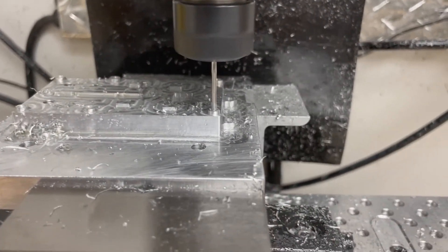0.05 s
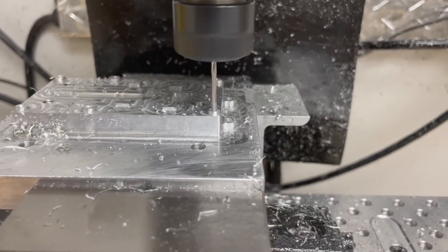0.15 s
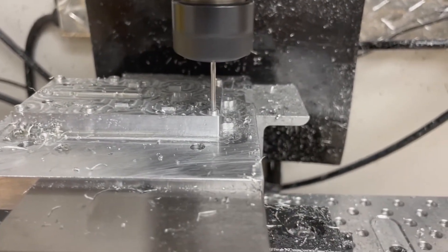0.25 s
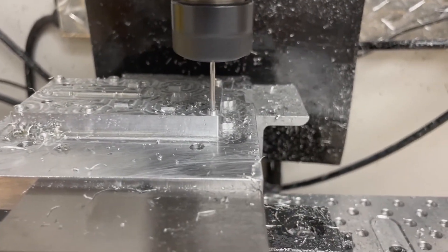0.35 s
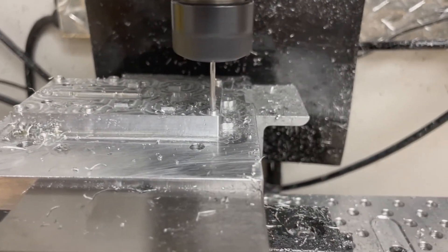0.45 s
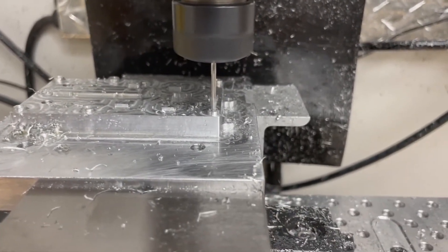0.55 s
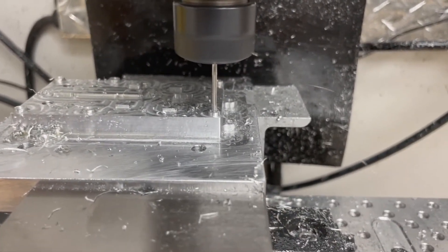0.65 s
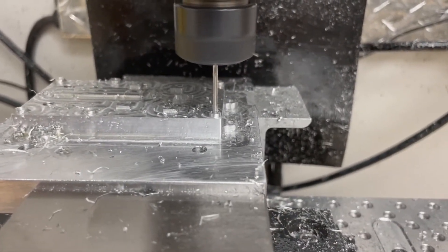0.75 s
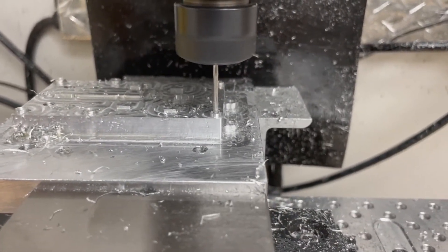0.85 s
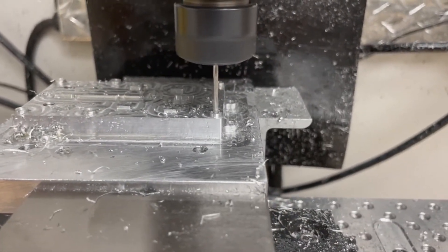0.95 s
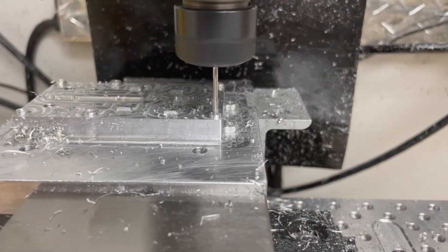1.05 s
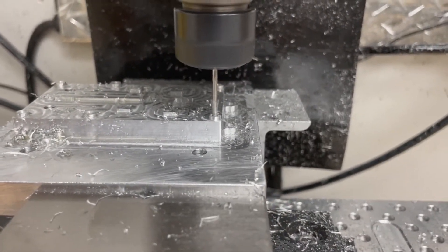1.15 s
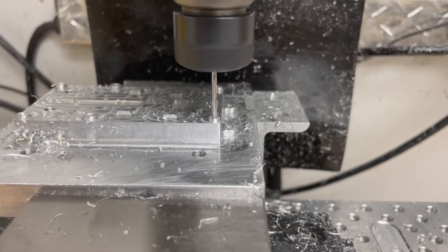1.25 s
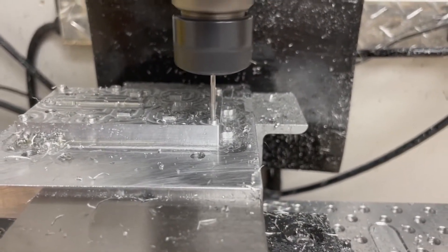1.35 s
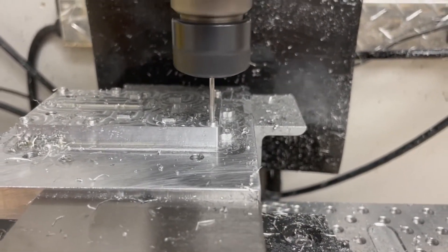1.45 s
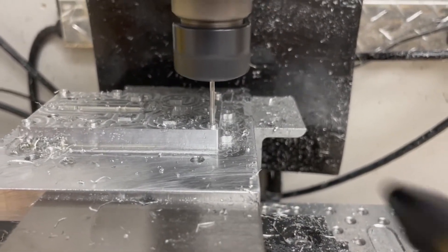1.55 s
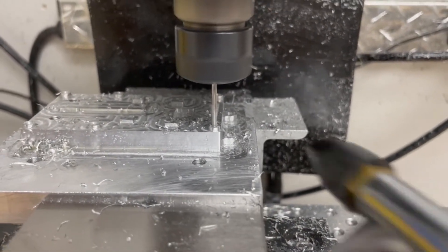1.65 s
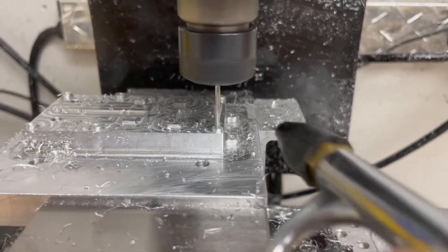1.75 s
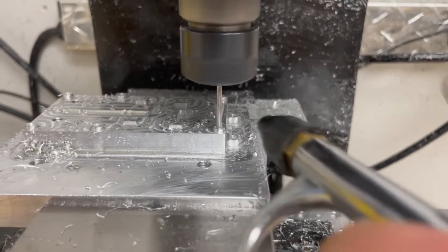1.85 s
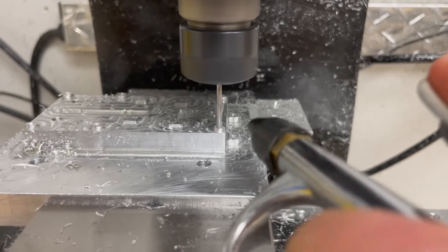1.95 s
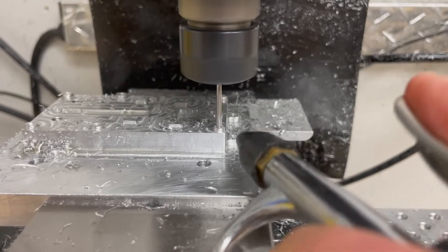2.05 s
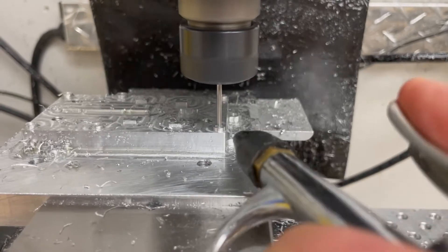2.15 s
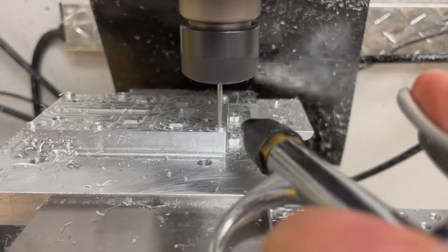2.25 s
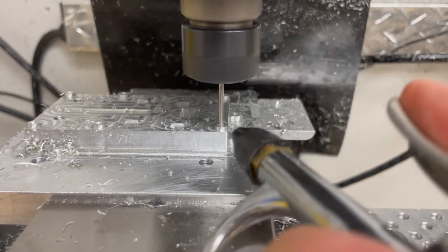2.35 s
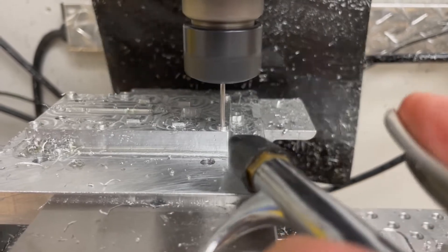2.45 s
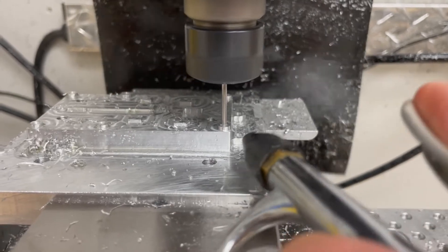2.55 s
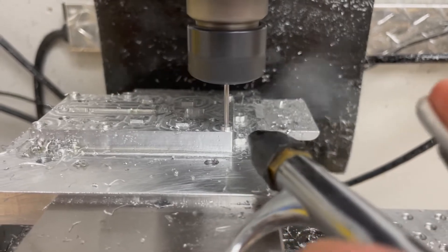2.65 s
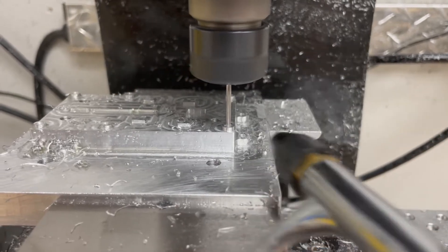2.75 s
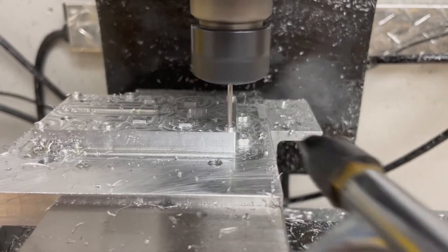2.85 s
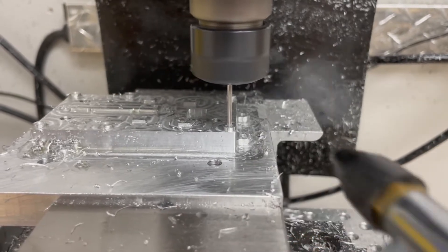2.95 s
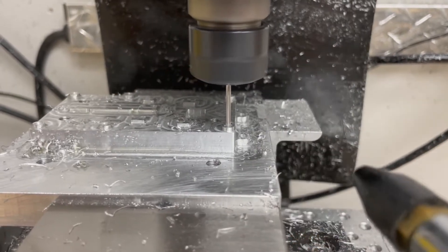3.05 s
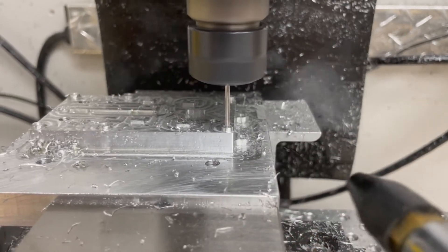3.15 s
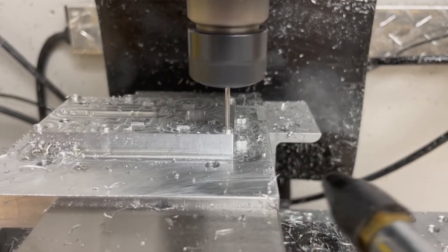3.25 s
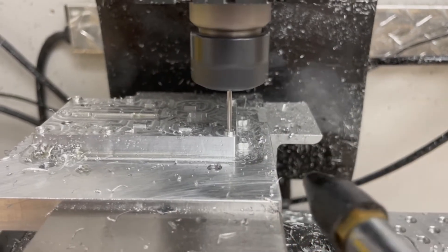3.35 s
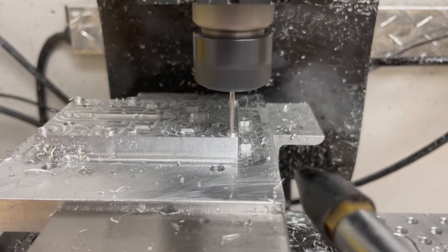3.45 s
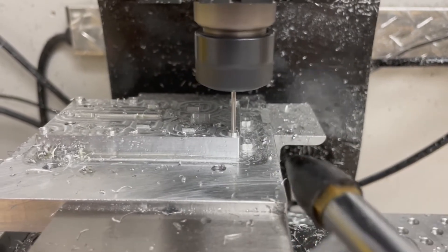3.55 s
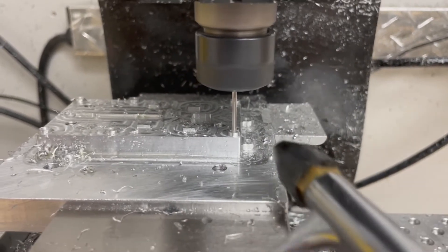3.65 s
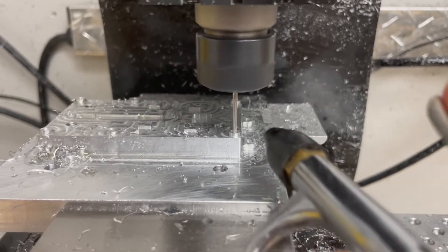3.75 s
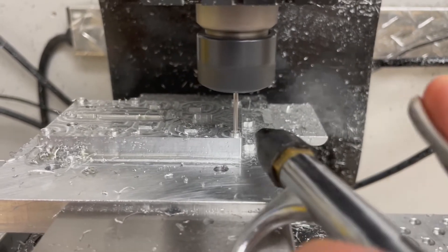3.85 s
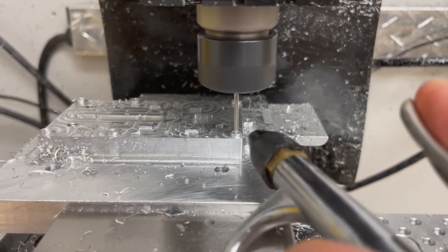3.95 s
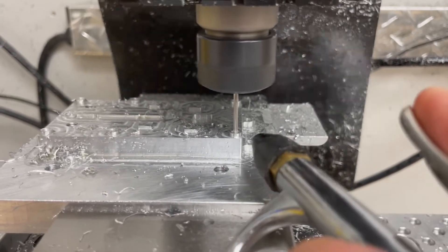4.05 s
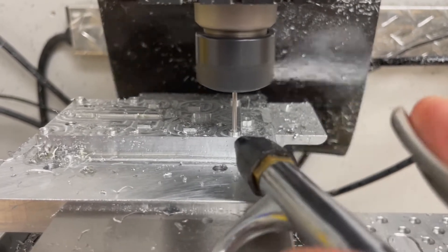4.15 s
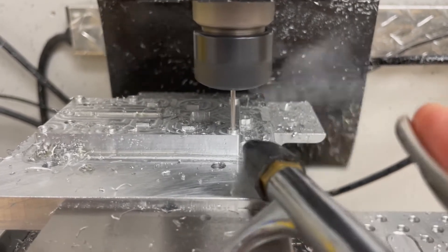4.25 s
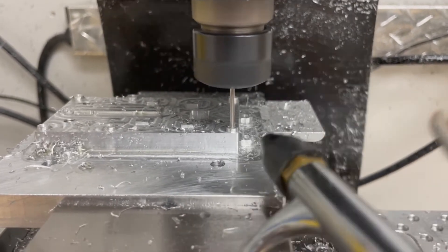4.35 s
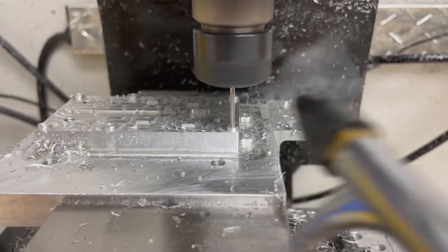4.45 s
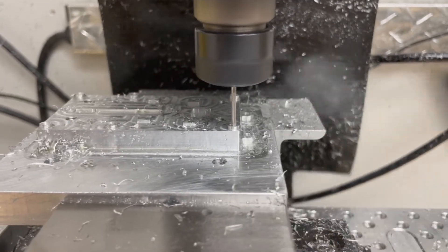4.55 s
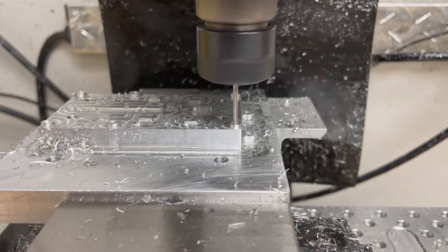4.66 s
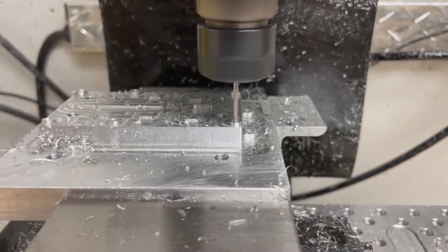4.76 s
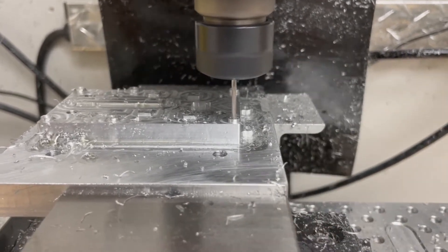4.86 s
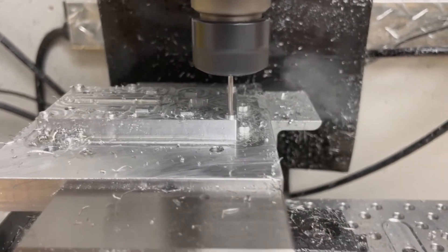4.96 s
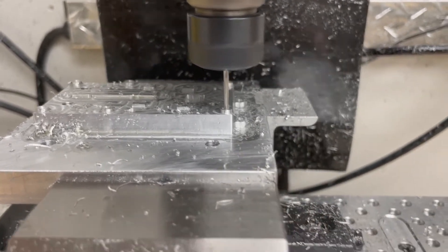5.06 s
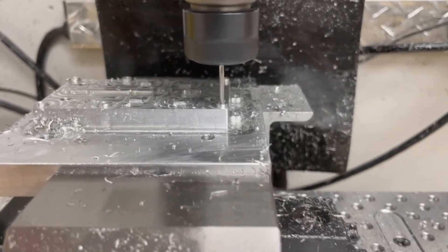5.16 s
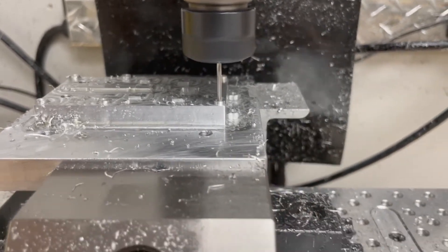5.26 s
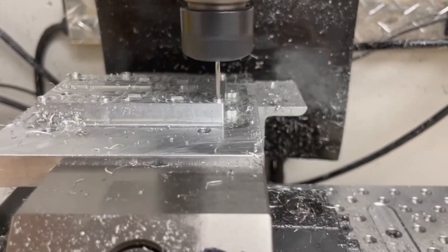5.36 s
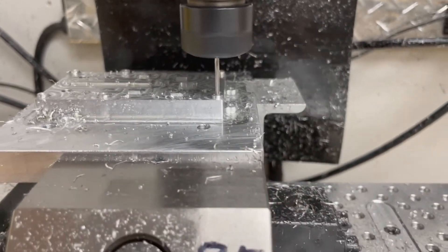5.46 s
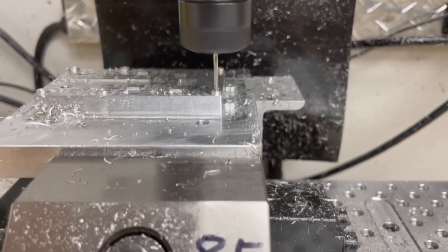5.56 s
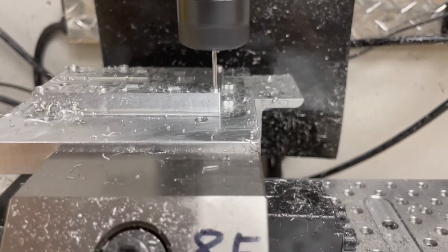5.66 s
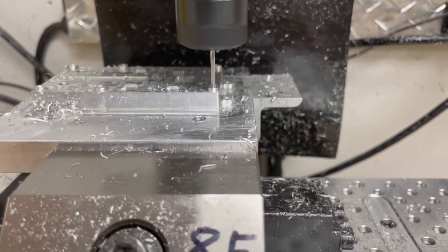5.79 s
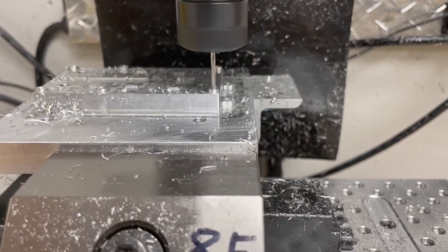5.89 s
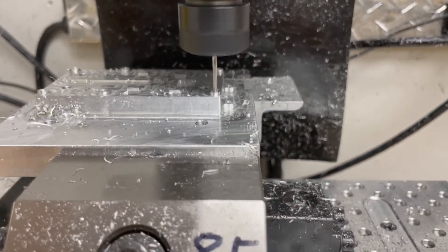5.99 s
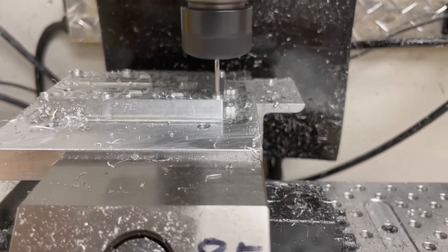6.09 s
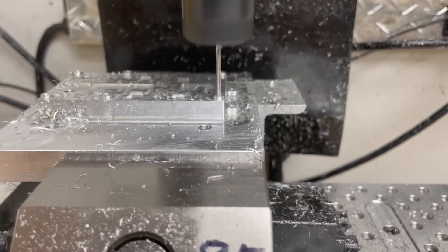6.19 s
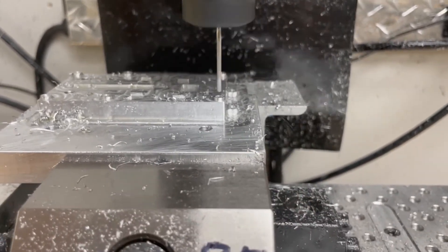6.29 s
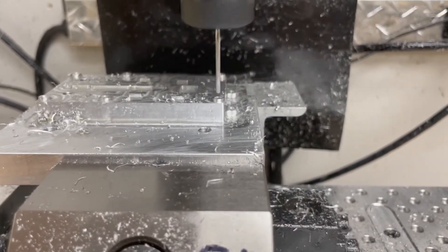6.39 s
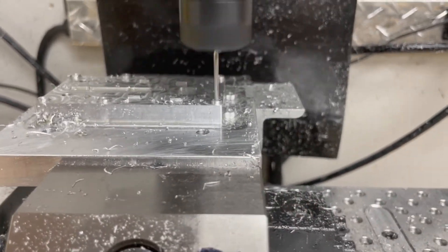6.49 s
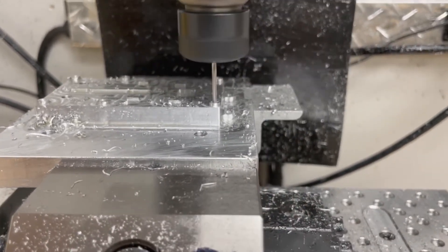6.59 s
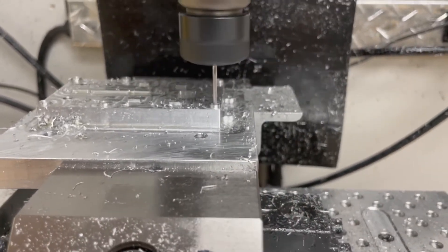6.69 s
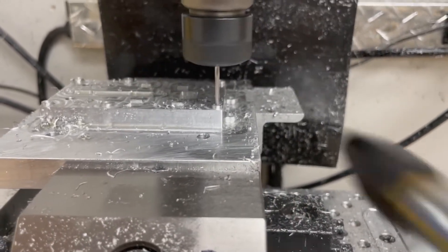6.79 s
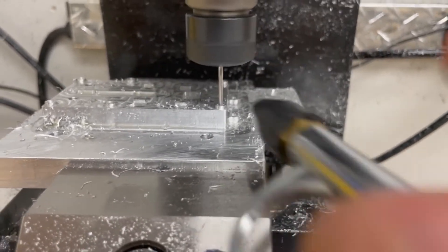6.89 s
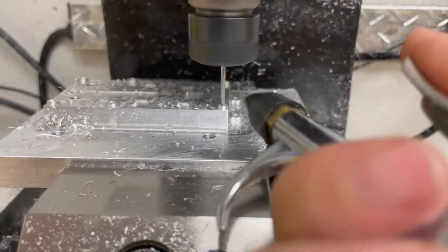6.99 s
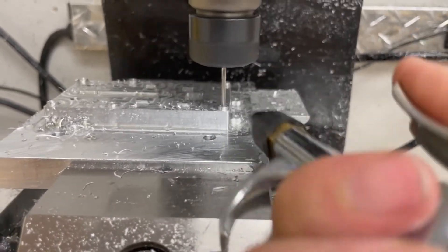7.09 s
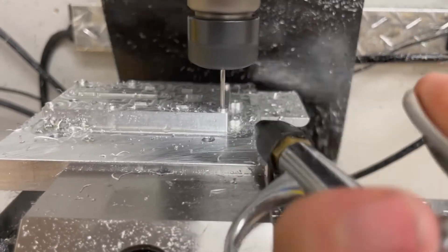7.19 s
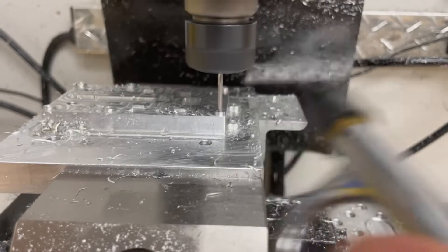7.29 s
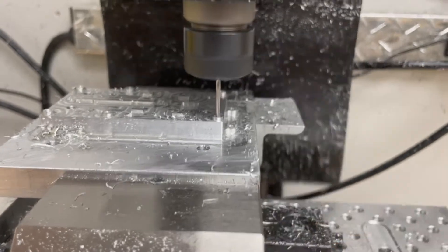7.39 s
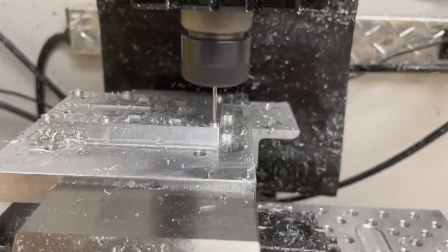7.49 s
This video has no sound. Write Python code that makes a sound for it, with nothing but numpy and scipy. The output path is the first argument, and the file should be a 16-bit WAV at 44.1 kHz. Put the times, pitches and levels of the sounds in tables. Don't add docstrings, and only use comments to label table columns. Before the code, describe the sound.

A small mill runs throughout, recorded close in stereo on a hand-held phone. Its bearings hiss, a thin whine sits near 10 kHz, and the housing rings roughly over a low rumble, all throbbing 45 times a second. Small metallic chirps and squeals surface at 0.7 and 1.4 s. At 2.06 s a strong, sagging air blast bursts out with a gusty thump, a weaker one at 2.33, with a low hose shudder between. The mill ducks, then returns quieter; rumble eases around 2.75-3.1. A feed motor groans with jolts at 3.5-3.9. Two more blasts hit at 3.97 and 4.24, hose shuddering between. A tiny axis nudge comes at 5.4, then a long, jerky low groan from 6.1 to 6.6. A slight air leak at 6.98 leads into the last short blast at 7.07; the quieter machine continues with a faint squeal until 7.5.

```python
import sys
import numpy as np
from scipy import signal
from scipy.fft import rfft, irfft, next_fast_len
from scipy.io import wavfile
from scipy.ndimage import uniform_filter1d

SR = 44100
rng = np.random.default_rng(int(sys.argv[2]) if len(sys.argv) > 2 else 0)


def amp(db):
    return 10 ** (np.asarray(db, float) / 20)


def write(x):
    x = np.atleast_2d(x).T
    wavfile.write(sys.argv[1], SR, np.round(np.clip(x, -1, 1) * 32767).astype(np.int16))


N = 332051
SIZE = next_fast_len(N)
HZ = np.maximum(np.arange(SIZE // 2 + 1) * SR / SIZE, 1)
TIME = np.arange(N) / SR
COARSE = TIME[::32]

# [f/Hz, lead/rad]
PORT_LEAD = [(520, 1.4), (1100, 0), (1640, 2.5), (2100, 1), (3100, 0.34), (3600, 2.15), (4400, 0.5),
             (5800, 2.5), (6700, 0.41)]
# [f/Hz, share 0-1]
PORT_COMMON = [(60, 0.56), (300, 0.88), (700, 0), (1600, 0.87), (3000, 0.65), (5500, 0.2), (7500, 0.8)]


def on_hz(table):
    hz, value = np.transpose(table)
    return np.interp(np.log(HZ), np.log(np.maximum(hz, 1)), value)


def shaped(x, gain):
    return irfft(rfft(x, SIZE) * gain, SIZE)[..., :N]


def unit(x, lo_hz=1, hi_hz=SR / 2):
    mid = shaped(np.atleast_2d(x).mean(axis=0), (HZ >= lo_hz) & (HZ <= hi_hz))
    return x / np.sqrt(np.mean(mid ** 2))


def bell(hz, width):
    return 1 / (1 + (2 * abs(HZ - hz) / width) ** 3)


def walk(rate):
    k = int(SR / rate)
    steps = np.repeat(rng.standard_normal(N // k + 1), k)
    return 1.05 * uniform_filter1d(uniform_filter1d(steps, k), k)[:N]


def ports(three, lead, common, colour=1):
    # [f/Hz, left lead/half turns]
    path = [(8600, 1), (10800, 2), (12650, 3), (14800, 4), (17200, 5)]
    # [f/Hz, share 0-1]
    treble_common = [(8200, .97), (16000, .97)]
    share = np.clip(on_hz(common + treble_common), 0, 1)
    bass_lead = [(200, 0)]
    treble_lead = [(hz, np.pi * k) for hz, k in path]
    left_right = np.array([[1], [-1]])
    turn = np.exp(.5j * on_hz(bass_lead + lead + treble_lead) * left_right)
    spectra = rfft(three, SIZE) * colour
    shared = spectra[0] * np.sqrt(share) * turn
    own = spectra[1:] * np.sqrt(1 - share)
    return irfft(shared + own, SIZE)[:, :N]


def held(start, stop, rise, fall, sag=0):
    attack = -rise * np.maximum(start - COARSE, 0)
    hold = -sag * np.clip(COARSE - start, 0, stop - start)
    return attack + hold - fall * np.maximum(COARSE - stop, 0)


def summed(envelopes_db):
    valve_s = .008
    power = sum(amp(2 * db) for db in envelopes_db)
    eased = uniform_filter1d(power, size=int(valve_s * SR / 32))
    return np.interp(TIME, COARSE, np.sqrt(abs(eased)))


def clatter(turns, memory):
    size = 1024
    memory = np.clip(memory, 0, .95)
    fresh = rng.standard_normal((3, int(turns[-1]) + 2, size))
    kept = signal.lfilter([np.sqrt(1 - memory ** 2)], [1, -memory], fresh, axis=1)
    return kept.reshape(3, -1)[:, (turns * size).astype(int)]


def throb(turns, place, depth_db):
    angle = 2 * np.pi * (turns - place)
    return amp(depth_db * (np.cos(angle) + 0.16 * np.cos(2 * angle)))


def evened(ring, width, share):
    swell = uniform_filter1d((ring ** 2).sum(axis=0), size=int(SR / width / 2))
    ring = ring / (swell + .05 * swell.mean()) ** (share / 2)
    return ring / ring.std()


def gain_control():
    # [ducks t/s, lets go t/s, settles at level/dB]
    ducks = [
        (2.06, 2.53, -7),
        (3.966, 4.397, -8.5),
        (7.084, 7.23, -8),
    ]
    ducked_db, duck_s, recover_s = -14, .13, 0.078
    points, rest_db = [], 0
    for start, stop, settled_db in ducks:
        points += [(start, rest_db), (start + duck_s, ducked_db)]
        points += [(stop, ducked_db), (stop + recover_s, settled_db)]
        rest_db = settled_db
    return np.interp(TIME, *np.transpose(points))


def frame_rumble(knocks):
    # [f/Hz, level/dB per Hz]
    rumble_colour = [(30, -18), (55, 7.5), (130, -6.5), (180, 5), (260, -2), (500, -12.5)]
    return unit(shaped(knocks, amp(on_hz(rumble_colour))), 34, 191)


def drive_whine():
    tone = np.sqrt(2) * np.sin(2 * np.pi * 10346 * TIME + 2.1 * walk(12))
    return tone * amp(-6 + 1.3 * walk(9))


def bearing_hiss(turns, treble_db, high_db):
    # [f/Hz, level/dB per Hz]
    bearing_colour = [(110, -21), (300, -13), (600, -14.5), (1300, -20), (2300, -15.5), (3150, -18.5),
                      (3900, -13.5), (5500, -10), (7000, -8), (8500, -3), (9500, 1.5), (10500, -4.5),
                      (11500, -8), (13000, -11), (15200, -3.5)]
    hiss = clatter(turns, memory=.12) * throb(turns, 0, depth_db=2.7)
    hiss = hiss * amp(0.94 * walk(300) + .5 * walk(7.8))
    hiss = unit(ports(hiss, PORT_LEAD, PORT_COMMON, amp(on_hz(bearing_colour))), 9455, 10530)
    duller = shaped(hiss, 1 / (1 + (HZ / 7800) ** 16))
    return (hiss - duller) * amp(treble_db) + duller * amp(high_db + 3.5)


def housing_rings(turns, low_knocks, high_knocks, low_db, high_db, cut_db):
    # [f/Hz, width/Hz, level/dB, place in the turn 0-1, throb depth/dB, left minus right/dB]
    housing = [(382, 48, -12, 0.47, 4, -0.5), (889, 54, -13, 0.85, 5, -2), (1116, 102, -13, 0.24, 2, -0.5),
               (1591, 112, -5, 0.4, 3, 0), (1780, 45, -6.5, 0.46, 4, 2.5), (1891, 108, -4, 0.06, 3.5, 4),
               (2729, 160, -5.5, 0.75, 3, 4), (3582, 390, -5, 0.18, 3.5, -1),
               (4070, 45, -13, 0.5, 7.5, 4.5), (4268, 68, -4.5, 0.27, 6.5, 6),
               (4680, 310, -4.5, 0.66, 6.5, 7.5)]
    # [t/s, f/Hz, swell/dB, length/s]
    squeals = [
        (0.696, 4070, 11.5, .07),
        (1.397, 1891, 7, 0.046),
        (3.45, 1891, 7, 0.061),
        (4.803, 1891, 3, 0.065),
        (6.6, 1891, 4, .08),
        (6.993, 2729, 11, .025),
        (7.4, 1891, 4.5, 0.12),
        (.6, 2729, -2.5, 0.42),
    ]
    top_ring_load = 0.62
    out = 0
    for hz, width, db, place, depth_db, pan_db in housing:
        ring = shaped(low_knocks if hz < 1400 else high_knocks, bell(hz, width))
        ring = evened(ring, width, share=.7) * throb(turns, place, depth_db)
        pan = amp(pan_db / 2 * np.array([[1], [-1]]))
        load_db = low_db + 3 if hz < 3200 else high_db - 2.0 + top_ring_load * cut_db
        for s, at, swell_db, length in squeals:
            if abs(at - hz) < width:
                load_db = load_db + swell_db * np.exp(-((TIME - s) / length) ** 2)
        out = out + ring / ring.std() * pan * amp(db + load_db + 2.2 * walk(3.5))
    return out


def spindle():
    # [t/s, cutting load/dB, phone drawn back/dB]
    cut_and_phone = [(0, 0.5, -0.5), (.65, 0.5, 0), (1.4, 0.5, 0.3), (2.0, 0.8, 0), (2.7, 0, 0.5),
                     (3.1, -5.5, 1.8), (3.55, -4.5, 1.7), (3.9, -2, 1.5), (4.6, -.6, -1.5), (5.3, -1, -2.5),
                     (5.9, -1, -3), (6.3, 1, -4), (6.7, -0.1, -2), (7.0, 1.5, -3), (7.53, 1.2, -1.5)]
    # [t/s, turns ahead of a steady shaft]
    turns_ahead = [(0, .57), (1, .44), (2, .34), (2.75, .3), (3.5, .12), (4.25, .25), (5, .35), (5.75, .42),
                   (6.5, .31), (7.53, .3)]
    s, *controls = np.transpose(cut_and_phone)
    cut_db, back_db = (np.interp(TIME, s, c) for c in controls)
    gain_db = gain_control()
    treble_db = -41.5 + gain_db + back_db
    low_db = -50 + gain_db + 0.13 * cut_db + 0.059 * back_db
    high_db = -44.5 + gain_db + 0.74 * cut_db + 0.56 * back_db
    rumble_db = -61 + gain_db + 0.74 * cut_db + .8 * back_db
    rest_start_s, rest_stop_s, rest_edge_s, rest_db = 2.75, 3.1, .08, -11
    inside_s = np.minimum(TIME - rest_start_s, rest_stop_s - TIME)
    rumble_db = rumble_db + rest_db * np.clip(inside_s / rest_edge_s, 0, 1)

    turns_per_s = 45
    turns = turns_per_s * TIME + np.interp(TIME, *np.transpose(turns_ahead))
    hiss = bearing_hiss(turns, treble_db, high_db)
    low_knocks, high_knocks = (ports(clatter(turns, memory), PORT_LEAD, PORT_COMMON) for memory in (.6, .25))
    rings = housing_rings(turns, low_knocks, high_knocks, low_db, high_db, cut_db)
    rumble = frame_rumble(low_knocks) * amp(rumble_db)
    return hiss + rings + drive_whine() * amp(treble_db) + rumble


def feed_motor():
    # [from t/s, to t/s, low groan level/dB, upper groan level/dB, gear rush level/dB]
    moves = [
        (3.516, 3.93, -91, -64, -61.5),
        (5.41, 5.44, -72, -85, -61.5),
        (6.09, 6.594, -66.5, -75, -67),
    ]
    # [t/s, low groan level/dB, upper groan level/dB, gear rush level/dB]
    jolts = [(3.68, -85, -49, -56), (3.846, -75, -58, -67), (3.93, -76, -60, -65), (6.096, -59, -54, -61),
             (6.17, -64, -75, -58), (6.22, -67, -75, -58), (6.325, -68, -54, -64), (6.366, -63, -52, -64),
             (6.53, -64, -72, -70), (6.595, -69, -58, -74)]
    move_db_per_s, jolt_db_per_s = 350, 422
    events = [(db, held(start, stop, move_db_per_s, move_db_per_s)) for start, stop, *db in moves]
    events += [(db, held(s, s, jolt_db_per_s, jolt_db_per_s)) for s, *db in jolts]
    low_gain, upper_gain, gear_gain = (summed(db[k] + shape for db, shape in events) for k in range(3))
    low, upper = (np.sqrt(2) * np.sin(2 * np.pi * hz * TIME + 1.8 * walk(35)) for hz in (110, 182))
    gear = unit(ports(rng.standard_normal((3, N)), PORT_LEAD, PORT_COMMON, bell(770, 1040)))
    return low * low_gain * amp(3 * walk(60)) + upper * upper_gain + gear * gear_gain


def hose_shudder():
    # [from t/s, to t/s, level/dB]
    shudders = [
        (2.2, 2.405, -61),
        (4.145, 4.28, -57.5),
    ]
    slope = 250
    gain = summed(db + held(start, stop, slope, slope) for start, stop, db in shudders)
    return np.sqrt(2) * np.sin(2 * np.pi * 57 * TIME) * gain


def air_gun():
    # [valve opens t/s, shuts t/s, level/dB, sag/dB per s, first overshoot/dB]
    blasts = [
        (2.063, 2.25, -20, 132, 0.5),
        (2.332, 2.47, -27.5, 21, -3.5),
        (3.973, 4.094, -25.5, 38, 5),
        (4.236, 4.349, -21.5, 137, -3),
        (7.067, 7.159, -20.5, 133, -1.5),
    ]
    # [from t/s, to t/s, level/dB]
    leak_events = [
        (2.048, 2.06, -33.5),
        (3.958, 3.97, -51),
        (6.978, 7.058, -42.5),
    ]
    # [t/s, peak level/dB, rise and fall/dB per s]
    gust_events = [(2.1, -27, 800), (2.123, -11.5, 1000), (2.148, -26.5, 800), (3.995, -39.5, 400),
                   (4.069, -39.5, 450), (4.258, -45.5, 450), (4.285, -48, 500), (7.08, -38, 700),
                   (7.125, -52, 300)]
    # [t/s, level/dB]
    aim = [(2.1, 0.5), (2.4, 1), (4.0, -6), (4.3, -3), (7.0, 6), (7.1, 1.5)]
    # [f/Hz, level/dB per Hz]
    jet_colour = [(3000, -36), (4300, -15.5), (5300, -6.5), (5700, -11.5), (6500, -5.5), (7500, 2.5),
                  (8500, -0.5), (10000, 0), (11500, -5), (13300, -7), (14200, -5.5), (15500, -2)]
    # [f/Hz, level/dB per Hz]
    rush_colour = [(100, -24), (300, -8), (1000, -3.5), (2000, 2.5), (3150, -5.5), (3600, -1), (4000, -1.5),
                   (4500, 2.5), (6000, -13)]
    # [f/Hz, level/dB per Hz]
    gust_colour = [(20, -22), (40, -7.5), (170, -3), (240, -13), (500, -21), (1200, -32), (2600, -92)]
    # [f/Hz, lead/rad]
    air_lead = [(1100, -1), (1550, 2), (2300, 0.77), (3000, 0), (4000, 1.5), (4600, -4), (5300, 5),
                (6600, 0.7)]
    # [f/Hz, share 0-1]
    air_common = [(100, 0.99), (1000, 1), (3000, 0.54), (6000, 0.16), (7500, 0.78)]
    # [f/Hz, share 0-1]
    gust_common = [(50, .985), (1000, .85)]
    open_db_per_s, shut_db_per_s, leak_db_per_s, overshoot_s = 1096, 1142, 330, 0.027

    def flow(sag_share):
        levels = []
        for start, stop, db, sag, over_db in blasts:
            overshoot = over_db * np.exp(-np.maximum(COARSE - start, 0) / overshoot_s)
            levels.append(db + overshoot + held(start, stop, open_db_per_s, shut_db_per_s, sag * sag_share))
        return levels

    leaks = [db + held(start, stop, leak_db_per_s, shut_db_per_s) for start, stop, db in leak_events]
    gusts = [db + held(s, s, slope, slope) for s, db, slope in gust_events]
    rush_flow = flow(.55)
    jet_gain = summed(flow(0.93) + leaks)
    rush_gain = summed([db - 13.5 for db in rush_flow] + [db - 17 for db in leaks])
    gust_gain = summed(gusts + [db - 32 for db in rush_flow])

    eddies = amp(0.69 * walk(200) + .5 * walk(40))
    jet = ports(rng.standard_normal((3, N)), air_lead, air_common, amp(on_hz(jet_colour)))
    rush = ports(rng.standard_normal((3, N)), air_lead, air_common, amp(on_hz(rush_colour)))
    gust = ports(rng.standard_normal((3, N)), air_lead, gust_common, amp(on_hz(gust_colour)))
    air = unit(jet, 6300, 10300) * jet_gain + unit(rush, 500, 2600) * rush_gain
    shaded = shaped(air, bell(4870, 3400))
    air = air + shaded * (amp(np.interp(TIME, *np.transpose(aim))) - 1)
    return air * eddies + unit(gust, 40, 450) * gust_gain + hose_shudder()


def scene():
    return spindle() + feed_motor() + air_gun()


def starve(x, scarce_db):
    # [f/Hz, depth/dB]
    masking = [(2000, 20), (2300, 11), (2700, 14), (3150, 6), (3550, 12), (3880, 7.5), (4200, 11),
               (5300, 9), (5600, 6.5), (5900, 9.5), (6500, 11), (8600, 10), (10800, 9), (12000, 5.5),
               (13400, 6), (14300, 8), (15300, 5)]
    size, count = 2048, 8
    spectra = signal.stft([x[0] + x[1], x[0] - x[1]], SR, nperseg=size)[2]
    power = (abs(spectra[:, :-1]) ** 2).reshape(2, -1, count, spectra.shape[2]).mean(axis=2)
    hz = np.arange(power.shape[1])[:, None] * count * SR / size
    power = np.where(hz > 6500, uniform_filter1d(power, size=3, axis=1), power)
    near = uniform_filter1d(power.sum(axis=0), size=9, axis=0)
    near = near * amp(-2 * np.interp(hz, *np.transpose(masking)))
    total = power.sum(axis=0).mean(axis=0)
    far = total * amp(2 * scarce_db) * (hz > 3000)
    attack = total > 9 * np.roll(total, 1)
    ragged = amp(3 * uniform_filter1d(rng.standard_normal(power.shape), size=3, axis=2))
    keep = (power * ragged > near + far) | (hz < masking[0][0]) | attack
    spectra[:, :-1] *= np.repeat(keep, count, axis=1)
    both, apart = signal.istft(spectra, SR, nperseg=size)[1][:, :N]
    return np.array([both + apart, both - apart]) / 2


def low_pass(x):
    return signal.sosfilt(signal.butter(12, 17000, fs=SR, output="sos"), x)


def record(dry):
    top_hz, rumble_hz = 15730, 40
    cut = shaped(dry, (HZ < top_hz) / np.sqrt(1 + (rumble_hz / HZ) ** 6))
    mix = starve(cut, scarce_db=-16.6)
    return low_pass(mix)


dry = scene()
out = record(dry)
write(out)
```